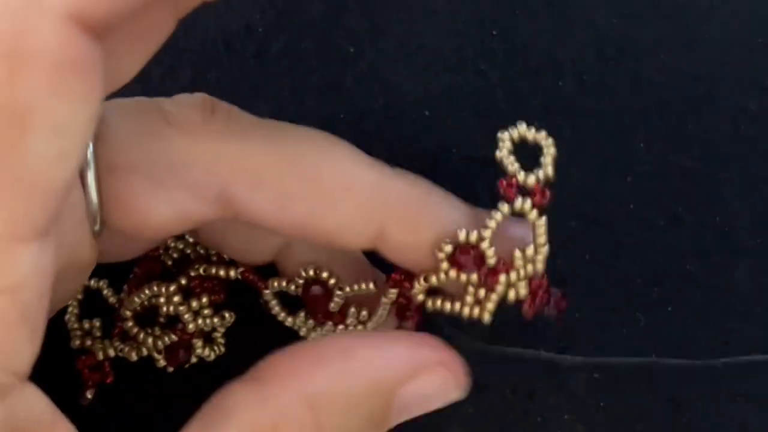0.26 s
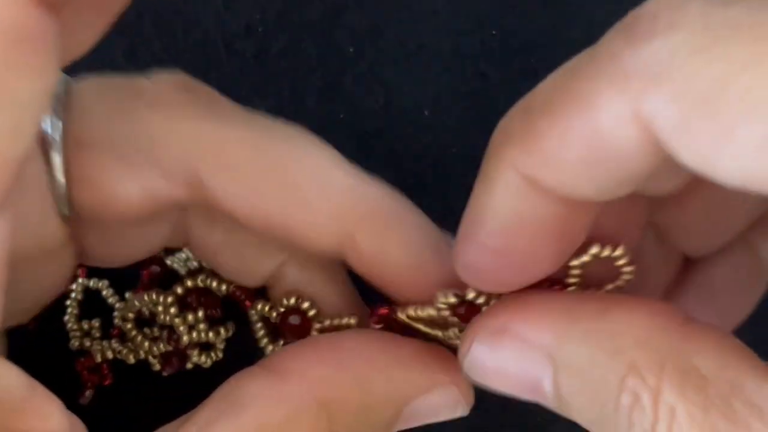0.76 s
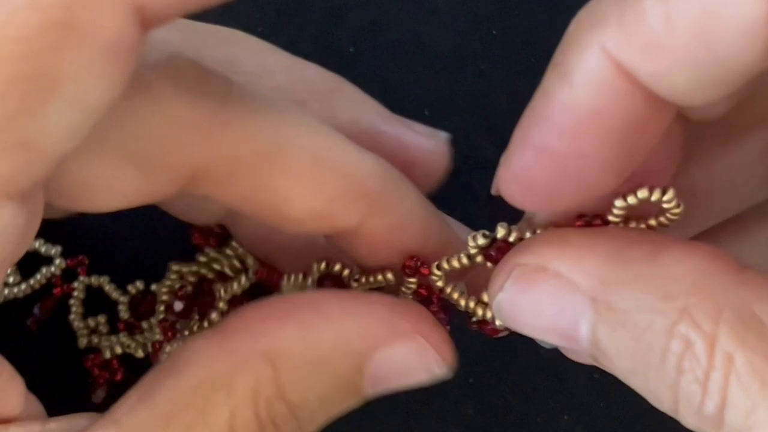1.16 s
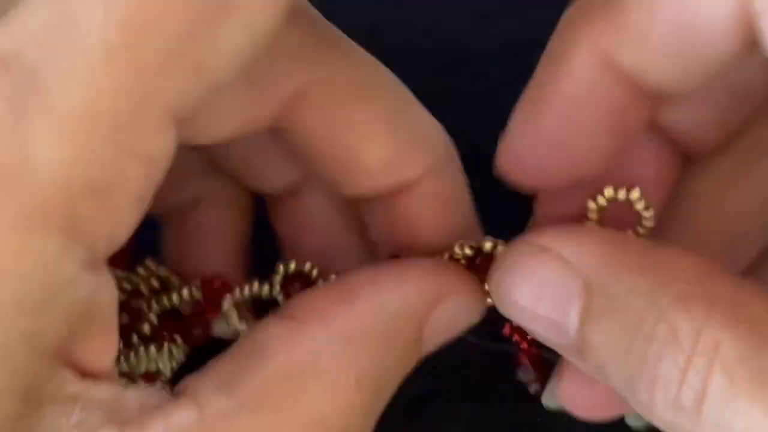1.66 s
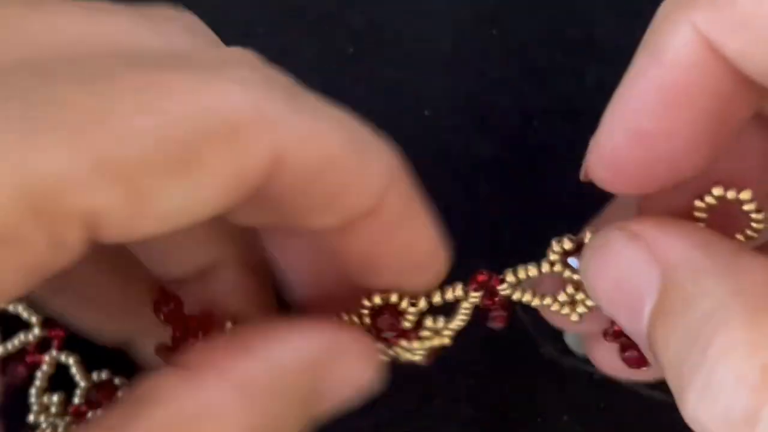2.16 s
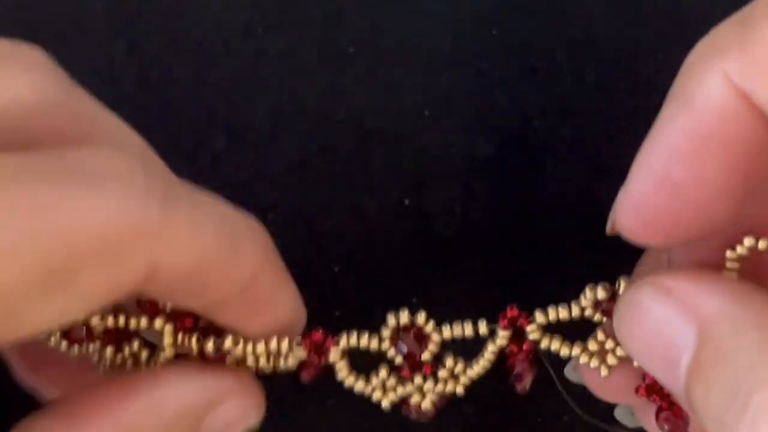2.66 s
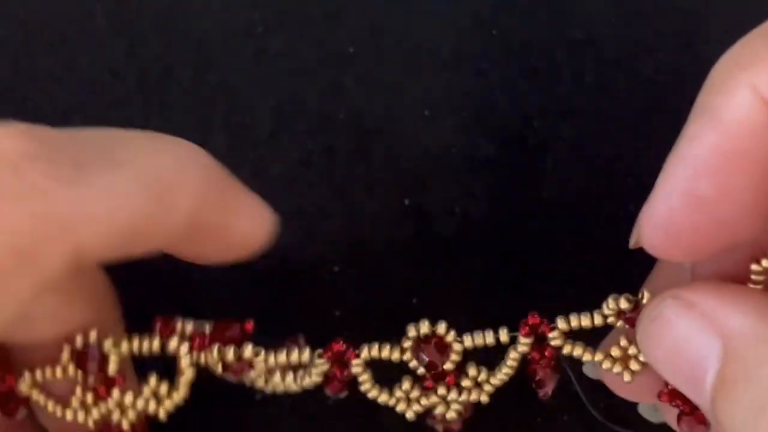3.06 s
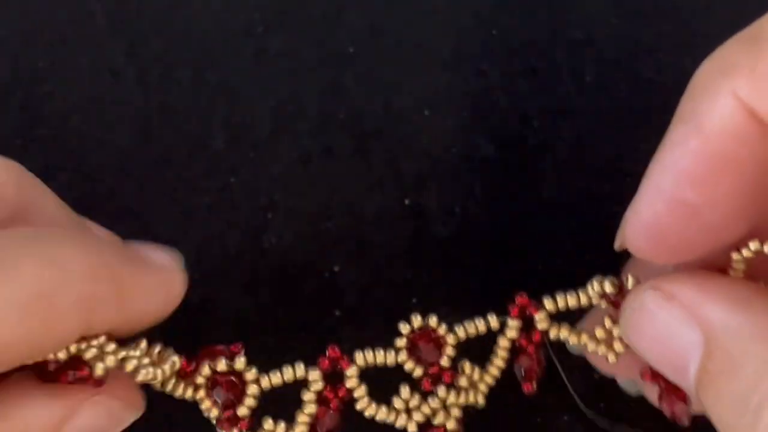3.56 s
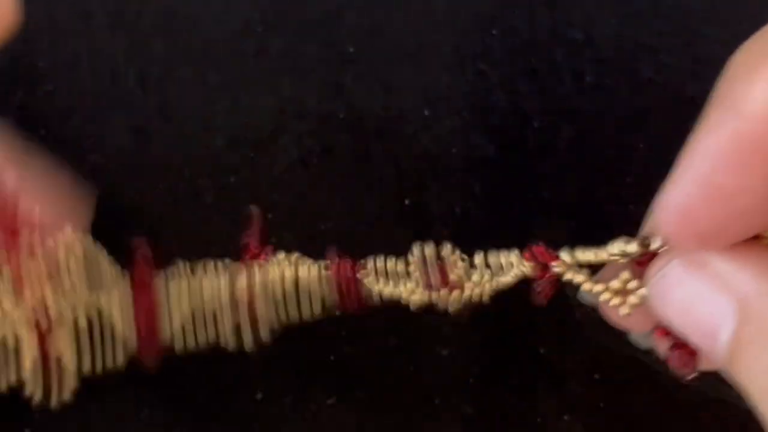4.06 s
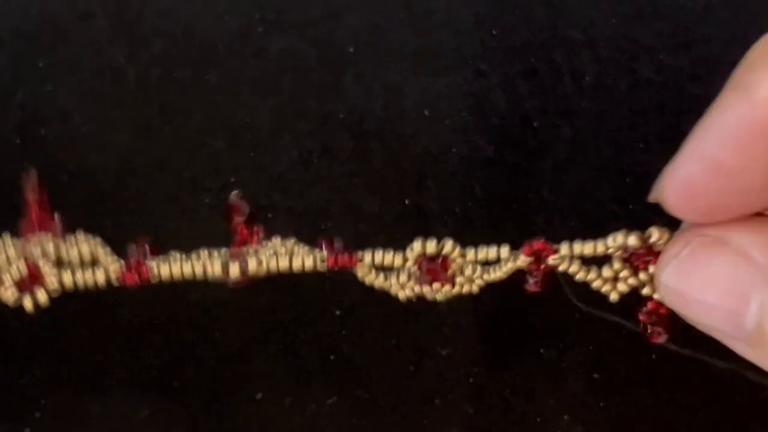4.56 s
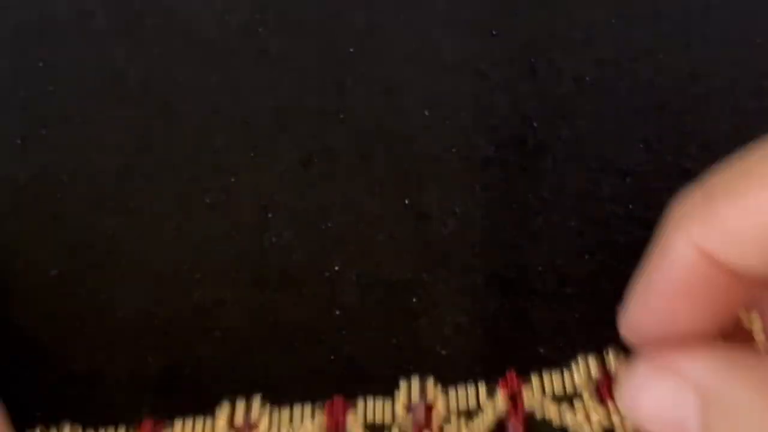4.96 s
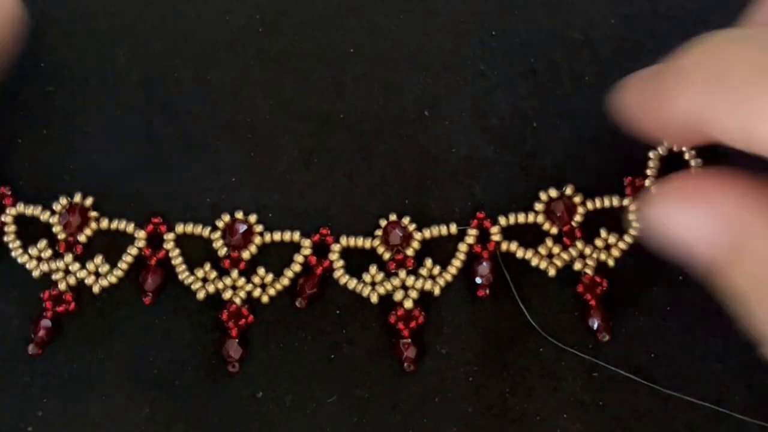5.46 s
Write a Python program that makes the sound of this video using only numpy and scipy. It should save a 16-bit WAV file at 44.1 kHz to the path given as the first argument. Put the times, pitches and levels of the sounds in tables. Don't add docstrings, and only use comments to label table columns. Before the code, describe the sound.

Glass beads click, tick and scrape softly over a cloth-covered table, in growing bursts, above a steady low machine hum in a small room.

```python
import sys
import numpy as np
from scipy import signal
from scipy.fft import rfft, irfft, next_fast_len
from scipy.io import wavfile
from scipy.ndimage import uniform_filter1d

SR = 44100
rng = np.random.default_rng(int(sys.argv[2]) if len(sys.argv) > 2 else 0)


def how_loud(loudness_db):
    steps = np.asarray(loudness_db, float) / 20
    return 10 ** steps


def store_wav(level_fs):
    pcm = np.round(np.clip(np.atleast_2d(level_fs), -1, 1) * 32767)
    wavfile.write(sys.argv[1], SR, pcm.T.astype(np.int16))


N = 250929

# (start [s], length [s], entry level [dB], exit level [dB])
SLIDE_EVENTS = [(1.937, 0.031, -77, -83), (2.068, 0.016, -86, -77), (2.085, 0.063, -67, -56.5),
                (2.186, 0.12, -65, -58), (2.311, 0.082, -56.5, -56.5), (2.43, 0.064, -73, -82),
                (2.48, 0.051, -61.5, -67.5), (2.551, 0.046, -68, -80.5), (2.644, .029, -65, -77.5),
                (2.778, 0.055, -89, -75), (2.865, 0.065, -69, -92), (3.167, 0.025, -71, -57),
                (3.398, 0.04, -72, -67.5), (3.662, 0.088, -71, -63.5), (3.711, 0.02, -51, -44.5),
                (3.752, 0.055, -56, -71), (3.842, .074, -73.5, -76), (3.952, 0.046, -62.5, -58.5),
                (4.09, 0.034, -65.5, -62), (4.185, .018, -64, -70), (3.313, 0.0149, -80, -84.5),
                (4.911, 0.015, -80, -84), (5.046, 0.031, -69, -46.5), (5.109, 0.042, -51.5, -59),
                (5.161, 0.084, -51.5, -57.5), (5.243, 0.035, -51, -46), (5.284, 0.027, -51, -47),
                (5.309, 0.073, -60, -54), (5.396, 0.015, -47, -46), (5.43, 0.017, -70, -58.5)]
# (time [s], ring [Hz])
BEAD_PITCH = [(2.1, 3900), (2.25, 3100), (2.42, 3200), (2.5, 3800), (2.8, 3800), (3.15, 3200), (3.4, 4100),
              (3.75, 3100), (4.2, 3250), (5.05, 3900), (5.25, 3700), (5.45, 3800)]


def evened(x):
    return x / np.sqrt(np.mean(x ** 2) + 1e-20)


def read(points, hz):
    f, value = np.transpose(points)
    return np.interp(np.log(hz + 1), np.log(f + 1), value)


def along(curve, s):
    return np.interp(s, *np.transpose(curve))


def add(mix, s, sound):
    part = mix[round(s * SR):][:len(sound)]
    part += sound[:len(part)]


def colour(x, points):
    log_gain = np.log(how_loud(read(points, abs(np.fft.fftfreq(4096, 1 / SR)))))
    taps = np.fft.ifft(np.exp(np.conj(signal.hilbert(log_gain)))).real[:1024]
    return signal.oaconvolve(x, taps / np.linalg.norm(taps))[:N]


def drift(per_s):
    t = np.arange(0, N + 256, 256) / SR
    rates = np.geomspace(.6, per_s, num=20)
    wander = sum(np.sin(2 * np.pi * (f * t + rng.random())) / np.sqrt(f) for f in rates)
    return np.interp(np.arange(N) / SR, t, evened(wander))


def machines(waver_db=.45, waver_turns=.02):
    steady_hz = 54.75
    # (multiple of the shaft, level [dB])
    steady_orders = [(1, -48), (1.35, -67), (6, -65.5), (7, -69.5)]
    # (time [s], shaft speed [Hz])
    shaft_speed = [(0, 20.76), (2.8, 20.66), (5.69, 20.61)]
    # (multiple of the shaft, first level [dB], last level [dB])
    slowing_orders = [(4, -55, -55.5), (6, -72.5, -62.5), (8, -50, -65.5), (9, -72, -65), (12, -61.5, -64),
                      (15, -72, -71), (16, -71, -83.5)]
    t = np.arange(N) / SR
    slowing_turns = np.cumsum(np.interp(t, *np.transpose(shaft_speed))) / SR
    lines = [(k * steady_hz * t, db + 0 * t, k) for k, db in steady_orders]
    for k, first, last in slowing_orders:
        lines.append((k * slowing_turns, first + (last - first) * t / t[-1], k / 3))
    hum = np.zeros(N)
    for turns, db, k in lines:
        level = how_loud(db + waver_db * np.sqrt(k) * drift(11.0))
        phase = turns + rng.random() + waver_turns * k * drift(3.0)
        hum += np.sqrt(2) * level * np.sin(2 * np.pi * phase)
    return hum


def air(level_db=-61.5, patchy_db=0.1):
    # (frequency [Hz], level per Hz [dB])
    air_spectrum = [(25, -22.5), (45, -10.5), (57, 4), (110, -0.5), (200, -8.5), (245, 1.5), (300, -7),
                    (420, -16.5), (600, -21.5), (1100, -30.5), (2300, -40), (5500, -43.5), (7800, -40),
                    (10000, -49.5), (11700, -49), (12400, -63)]
    # (frequency [Hz], correlation [0 to 1])
    likeness = [(60, .999), (300, 0.92), (600, 0.18), (1000, 0.1), (1800, 0.49), (5000, 1), (9000, 0.82),
                (15000, 0.27)]
    frames, hz = N // 512 + 5, np.fft.rfftfreq(2048, 1 / SR)
    a, b, c, d, patches = rng.standard_normal((frames, 1025, 5)).T
    patches = uniform_filter1d(patches, size=40, axis=0)
    patches = evened(uniform_filter1d(patches, size=6, axis=1))
    same = np.clip(read(likeness, hz), -1, 1)[:, None]
    left, other = a + 1j * b, c + 1j * d
    z = np.array([left, same * left + np.sqrt(1 - same ** 2) * other])
    z *= how_loud(read(air_spectrum, hz)[:, None] + patchy_db * patches)
    return how_loud(level_db) * evened(signal.istft(z, nperseg=2048, noverlap=1536)[1][:, :N])


def press(s, length, entry_db, exit_db, rise_s=0.011, fall_db_per_s=900):
    t = np.arange(round((length + 0.055) * SR)) / SR
    db = np.interp(t, [0, length], [entry_db, exit_db]) - fall_db_per_s * np.maximum(t - length, 0)
    return how_loud(db) * np.sin(np.pi / 2 * np.minimum(t / rise_s, 1)) ** 2


def brushes():
    # (start [s], length [s], level [dB], fizz level [dB])
    brush_events = [(0, 0.015, -77.5, -83), (0.322, 0.017, -84, -99), (0.439, 0.059, -73.5, -80),
                    (0.697, 0.086, -93.5, -91), (1.14, 0.055, -96, -100), (1.398, 0.11, -95, -90),
                    (1.658, 0.053, -99, -91), (1.894, 0.091, -91, -93), (2.028, .05, -87, -91),
                    (3.512, 0.097, -90, -80), (4.212, 0.063, -80.5, -86), (4.42, 0.039, -76.5, -92),
                    (4.519, 0.024, -99, -84.5), (4.815, 0.098, -91, -99)]
    # (frequency [Hz], level [dB])
    skin_spectrum = [(1500, -33), (2400, -12), (3000, 1), (4200, 0.5), (5000, -4.5), (6500, -5), (8000, -7),
                     (11000, -9), (14000, -15.5)]
    # (frequency [Hz], level [dB])
    fizz_spectrum = [(7000, -31), (11000, 1.5), (13500, 1), (15600, -1.5), (16500, -23.5)]
    force = np.zeros((2, N))
    for s, length, db, fizz_db in brush_events:
        add(force[0], s, press(s, length, db, db))
        add(force[1], s, press(s, length, fizz_db, fizz_db))
    skin, fizz = force * rng.standard_normal((2, N))
    return colour(skin, skin_spectrum) + colour(fizz, fizz_spectrum)


def blows():
    # (time [s], blow [dB], ring [Hz], glassy edge above the blow [dB])
    drop_events = [(2.4952, -42, 3780, -35), (2.6441, -50.5, 3900, -15.5), (2.735, -38, 4060, -17.5),
                   (2.944, -39.5, 3750, -6.5), (3.1823, -54.5, 3600, 4.5), (3.1923, -34.5, 3760, -4.5),
                   (3.3677, -46.5, 3450, -8), (3.3912, -27, 4210, -12.5), (3.443, -50, 4340, -13.5),
                   (3.655, -35, 3860, -13.5), (3.6775, -32, 3330, -4.5), (3.6786, -28, 3850, -7),
                   (3.7196, -42.5, 3580, -2), (3.7259, -24, 3110, -22.5), (3.7292, -31, 3030, -4),
                   (3.7485, -38, 3350, -14.5), (3.9231, -41.5, 3300, -14.5), (4.001, -44, 3000, -24),
                   (4.1398, -43.5, 3476, -18), (5.0393, -45.5, 3360, -3), (5.052, -26, 3720, 0),
                   (5.0822, -31.5, 4400, -13.5), (5.1902, -48.5, 3100, -18.5), (5.1773, -36.5, 4700, -11.5),
                   (5.2905, -34, 4360, -19), (5.3722, -32.5, 4000, -18), (5.4037, -21, 3730, -10.5),
                   (5.4069, -33, 3960, 0.5), (5.4149, -44.5, 3720, 3.5), (5.3932, -42, 3600, -31)]
    # (time [s], blow [dB], glassy edge above the blow [dB])
    tick_events = [(2.101, -57, -23), (2.4337, -53.5, -21), (2.5096, -49, -25), (2.5318, -48, -25),
                   (2.5689, -54, -35), (2.655, -56, -21), (2.8286, -53.5, -21), (2.916, -61, -7),
                   (2.932, -62, -12), (3.0377, -59.5, -14), (3.0544, -60.5, -26), (3.077, -61, -22),
                   (3.1768, -62, 9), (3.2192, -60, -16), (3.3717, -51, -10), (3.415, -56, -13),
                   (3.4313, -49, -16.5), (3.7754, -55, -2.5), (3.7848, -52, -7), (3.8672, -55, -13),
                   (3.8992, -53.5, -18), (3.9102, -57, -13), (3.9635, -50, -21), (3.9951, -45.5, -26),
                   (4.103, -50, -20), (4.2, -55, -10.5), (5.1098, -46, -13), (5.1555, -47.5, -5),
                   (5.358, -37, -13), (5.453, -40, -10.5)]
    # (time [s], blow [dB])
    ping_events = [(0.338, -89), (0.7511, -88), (1.1522, -79.5), (1.4142, -78), (1.951, -74.5),
                   (3.1696, -65), (3.3564, -74), (4.2413, -72.5), (4.348, -76.5), (4.398, -70.5),
                   (4.4392, -68.5), (4.4568, -72.5), (4.8272, -78)]
    ping_hz, ping_edge_db = 7500, 1.5
    trip_gap_s, trip_db, trip_spread_db, trip_edge_db = .016, 3.5, 1, -18.5
    knock_db, knock_softer = -14.5, 0.23
    rows = drop_events + [(s, db, along(BEAD_PITCH, s), edge_db) for s, db, edge_db in tick_events]
    rows += [(s, db, ping_hz, ping_edge_db) for s, db in ping_events]
    chances = rng.standard_normal((len(SLIDE_EVENTS), 12, 3))
    for (s, length, entry_db, exit_db), luck in zip(SLIDE_EVENTS, chances):
        times = np.cumsum(trip_gap_s * np.exp(.5 * luck[:, 0]))
        for t, (_, b, c) in zip(times, luck):
            db = entry_db + (exit_db - entry_db) * t / length + trip_db + trip_spread_db * b
            db = db if t < length else -150
            rows.append((s + t, db, along(BEAD_PITCH, s) * (1 + .07 * c), trip_edge_db + 5 * c))
    rows = np.array(rows)
    knocks = knock_db - knock_softer * np.maximum(rows[:, 1] + 45, 0)
    return np.column_stack([rows, knocks])


def taps(crack=0.69, snap=3.1, knock_t60=0.0056):
    ring_t60, crack_t60, edge_t60, rise_s = .0035, .0035, .0019, .00015
    edge_snap, knock_snap = 4.2, 6.6
    t, drive = np.arange(400) / SR, np.zeros((3, N))
    strikes = blows()
    rattles = rng.standard_normal((len(strikes), 3, 400))
    rattles[:, :, 6] = snap, edge_snap, knock_snap
    rise = 1 - np.exp(-t / rise_s)
    for (s, blow_db, hz, edge_db, knock_db), rattle in zip(strikes, rattles):
        ring = np.sin(2 * np.pi * hz * t) * how_loud(-60 * t / ring_t60)
        body = 0.9 * ring + crack * rattle[0] * how_loud(-60 * t / crack_t60)
        add(drive[0], s, how_loud(blow_db + 5) * rise * body)
        soft = np.clip((-40 - blow_db) / 20, -.35, 1)
        smoothing = np.convolve([1, soft], [1, soft]) / (1 + abs(soft)) ** 1.5
        edge = signal.lfilter(smoothing, 1, rattle[1])
        edge = edge * how_loud(-60 * t / (edge_t60 * (1 + 0.88 * max(soft, 0))))
        add(drive[1], s, how_loud(blow_db + edge_db + 12.5) * rise * edge)
        knock = rattle[2] * how_loud(-60 * t / knock_t60)
        add(drive[2], s, how_loud(blow_db + knock_db + 4.5) * rise * knock)
    return drive


def thud():
    # time [s], level [dB], final pitch [Hz], t60 [s]
    landing = (.452, -39, 85, .05)
    s, db, hz, t60 = landing
    t, out = np.arange(SR // 4) / SR, np.zeros(N)
    turns = hz * (t + .006 * (1 - np.exp(-t / .004)))
    add(out, s, how_loud(db - 60 * t / t60) * (1 - np.exp(-t / .001)) * np.sin(2 * np.pi * turns))
    return out


def catches(per_s, spread_db):
    sizes = how_loud(spread_db * np.minimum(rng.exponential(1, N), 4)) * rng.choice([-1., 1.], N)
    return evened(sizes * (rng.random(N) < per_s / SR))


def slides(clump_db=2.3, broad=.6, hiss=.6, cycles=2.2, board_db=-9):
    # (time [s], level above the cloth [dB])
    bare_glass = [(2, -11), (2.3, -10), (2.55, -13.5), (2.87, 2), (3.3, -9.5), (3.7, -3), (3.85, -4.5),
                  (4.05, -19.5), (4.2, -3), (5.07, -10.5), (5.26, -2.5), (5.44, -9.5)]
    large_hz, small_hz = 2720, 4700
    t = np.arange(200) / SR
    rings = []
    for hz in np.geomspace(2800, 4800, num=8):
        ring = np.sin(2 * np.pi * hz * t) * np.exp(-hz * t / cycles)
        rings.append(signal.oaconvolve(catches(330, 1.4), ring)[:N])
    glass = catches(3000, 0.92) + hiss * rng.standard_normal(N)
    clumps = uniform_filter1d(rng.standard_normal(N), size=160)
    clumps = evened(uniform_filter1d(clumps, size=160))
    force, small = np.zeros((2, N)), np.zeros(N)
    for s, length, entry_db, exit_db in SLIDE_EVENTS:
        edge_db = along(bare_glass, s)
        share = (along(BEAD_PITCH, s) - large_hz) / (small_hz - large_hz)
        add(force[0], s, press(s, length, entry_db, exit_db))
        add(force[1], s, press(s, length, entry_db + edge_db, exit_db + edge_db))
        small[round(s * SR):] = np.clip(share, 0, 1)
    large_rings, small_rings = evened(sum(rings[:4])), evened(sum(rings[4:]))
    cloth = np.sqrt(1 - small) * large_rings + np.sqrt(small) * small_rings + broad * catches(5000, 3.6)
    grains = [evened(g * how_loud(clump_db * clumps)) for g in (cloth, glass, catches(4000, 1.8))]
    return np.array([force[0], force[1], force[0] * how_loud(board_db)]) * grains


def room(x, own=0.12):
    # (frequency [Hz], t60 [s])
    decay = [(500, 0.48), (2000, 0.19), (4000, 0.15), (8000, 0.17), (15000, 0.22)]
    train = np.zeros((3, SR // 2))
    at = np.arange(240, SR // 2 - 20, 20) + rng.integers(0, 20, (3, (SR // 2 - 241) // 20))
    np.put_along_axis(train, at, rng.choice([-1., 1.], at.shape), 1)
    hz, t, z = signal.stft(train[0] + own * train[1:], SR, nperseg=256)
    tail = signal.istft(z * how_loud(-60 * t / read(decay, hz)[:, None]), SR, nperseg=256)[1]
    return signal.fftconvolve(x[None], tail / np.linalg.norm(tail[0]), axes=1)[:, :N]


def scene():
    # (frequency [Hz], level [dB])
    cloth_body = [(1500, -22), (2350, -11.5), (3000, 0), (4200, -5), (5000, -5.5), (6500, 1.5),
                  (9000, -39.5)]
    # (frequency [Hz], level [dB])
    glass_body = [(3000, -30.5), (5500, 1.5), (7000, 3), (9000, -2.5), (11000, -4.5), (13500, -7.5),
                  (15800, -16.5), (16400, -33.5)]
    # (frequency [Hz], level [dB])
    board_body = [(400, -37.5), (750, -6), (1100, -3.5), (1850, 3.5), (2400, -13.5), (3200, -37.5)]
    drives = slides() + taps()
    beads = brushes()
    for drive, body in zip(drives, (cloth_body, glass_body, board_body)):
        beads = beads + colour(drive, body)
    return beads + how_loud(-12.5) * room(beads) + thud() + machines() + air()


def roll_off(x):
    return signal.sosfilt(signal.butter(12, 16960, fs=SR, output="sos"), x)


def record(dry):
    # (frequency [Hz], lead [rad])
    left_lead = [(0, 0), (100, -.04), (330, -.4), (1700, -.25), (2150, .3), (2600, 2.1), (2900, 2.1),
                 (4100, .65), (4500, .9), (5800, 3), (8700, 6.2), (9500, 6.4), (11800, 9.15), (13000, 9.85),
                 (15200, 12.5)]
    # (frequency [Hz], level [dB])
    left_lean = [(80, 0), (200, -.8), (400, -1.2), (700, .6), (1400, 0)]
    size = next_fast_len(N + 2048)
    hz = np.fft.rfftfreq(size, 1 / SR)
    dry = dry * np.minimum(np.arange(N) / 10, 1)
    sides = np.array([[.5], [-.5]])
    phase = np.interp(hz, *np.transpose(left_lead)) * (sides - .5)
    turn = np.exp(1j * phase) * how_loud(read(left_lean, hz) * sides)
    turn *= how_loud(np.interp(hz, [15900, 16200], [0, -12]))
    mix = irfft(rfft(dry, size) * turn, size)[:, :N]
    return roll_off(mix)


dry = scene()
out = record(dry)
store_wav(out)
```